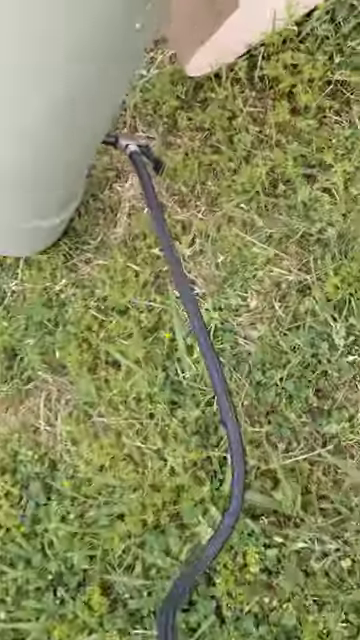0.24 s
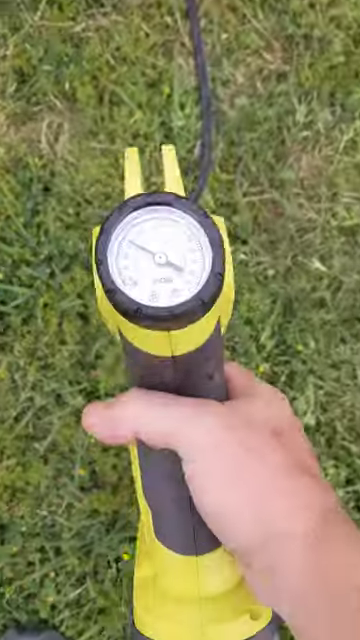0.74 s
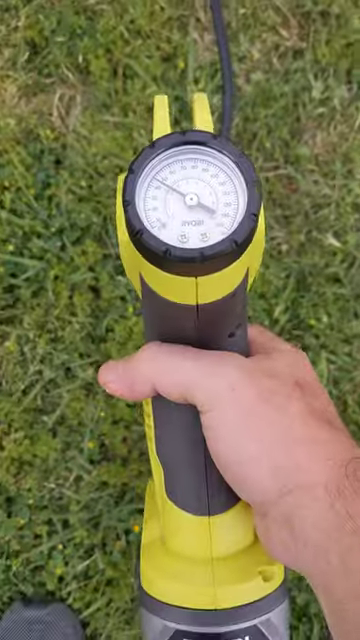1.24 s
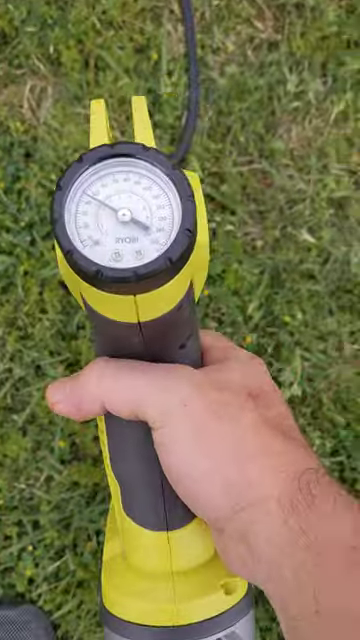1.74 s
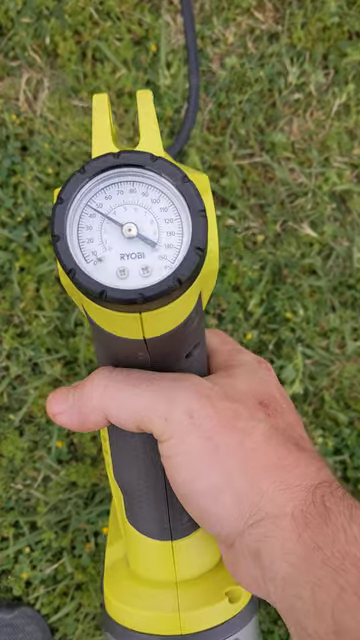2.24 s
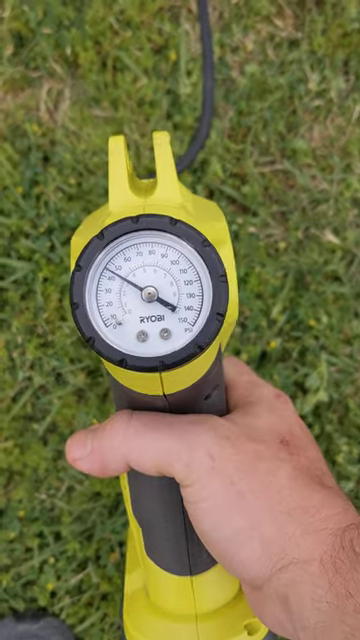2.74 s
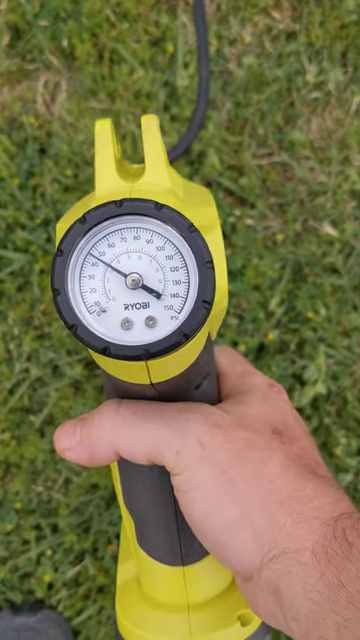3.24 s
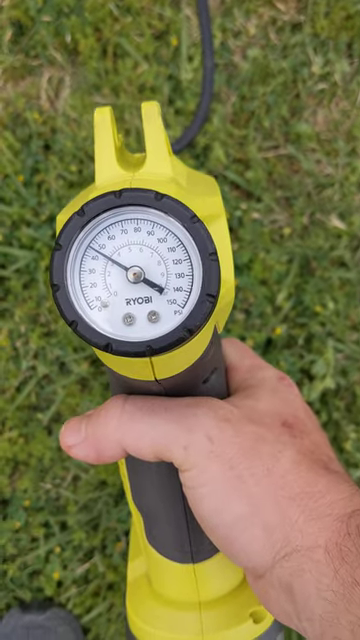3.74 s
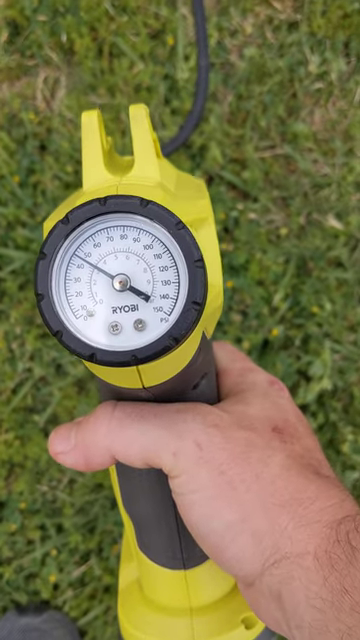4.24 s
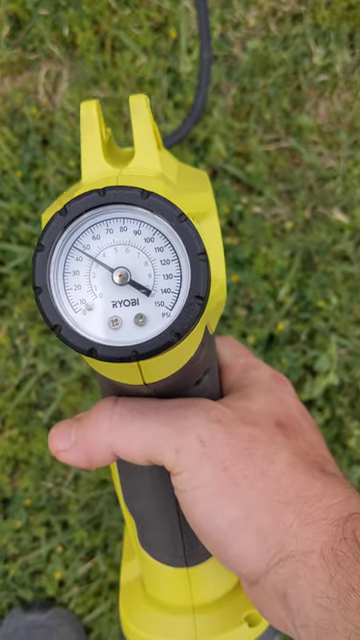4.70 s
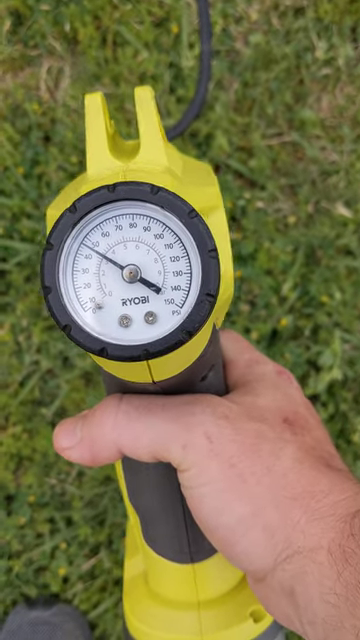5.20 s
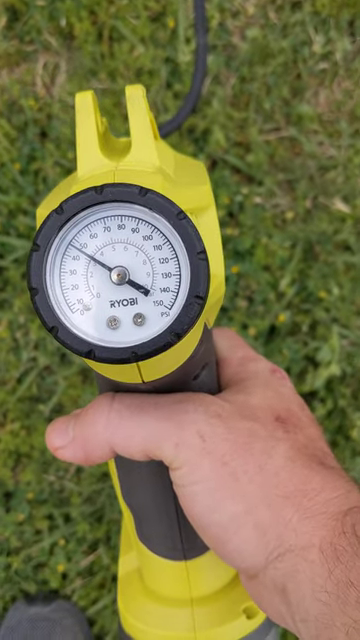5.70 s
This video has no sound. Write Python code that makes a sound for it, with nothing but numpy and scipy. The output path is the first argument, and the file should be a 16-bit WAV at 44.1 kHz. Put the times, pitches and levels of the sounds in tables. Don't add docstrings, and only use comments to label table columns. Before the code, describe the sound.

Sharp steady leak hiss and low wind thumps, then an electric air pump starts abruptly into a fast, harsh, rattling buzz.

```python
import sys
import numpy as np
from scipy import signal
from scipy.fft import rfft, irfft, next_fast_len
from scipy.io import wavfile
from scipy.ndimage import uniform_filter1d, map_coordinates

SR = 44100
rng = np.random.default_rng(int(sys.argv[2]) if len(sys.argv) > 2 else 0)


def amp(db):
    return 10 ** (np.asarray(db, float) / 20)


def write(x):
    x = np.atleast_2d(x).T
    wavfile.write(sys.argv[1], SR, np.round(np.clip(x, -1, 1) * 32767).astype(np.int16))


N = 262836

# time_s, level_db, turned_away (0-1), left_lag_samples
LEAK_PATH = [
    (0, -19.5, .02, 17.5),
    (.08, -20, .03, 18.5),
    (.25, -23, 0.88, 16.4),
    (.5, -26.5, 0.84, 15.8),
    (.68, -29, .8, 18.7),
    (1, -29.5, .8, 18.9),
    (5.96, -32, .98, 18.4),
]
# pitch_hz, facing_left_db, facing_right_db, away_left_db, away_right_db
JET_COLOUR = [(300, -40, -32, -8, -23), (1000, -38, -28, -15, -14), (1540, -37, -28, -8, -16),
              (2680, -24, -20, -25, -18.5), (3560, -12, -13.5, -18, -4.5), (4600, 1, 1, -4, -4),
              (5230, -5, -4, -4.5, 5), (6100, -4, 2.5, 8, 5.5), (7100, -5, 1, -18, -17),
              (8100, -35, -8, -6, -15), (10100, -32, -12.5, -17, -10.5), (12500, -32, -14, -16, -11.5),
              (14500, -32, -16, -28, -24), (16000, -40, -22, -23, -13)]
# start_s, length_s, level_db
LEFT_GUSTS = [(0, 0.35, -16.5), (1.01, .16, -8.5), (1.35, .1, -22), (1.77, 0.15, -7.5), (1.96, .1, -15),
              (2.4, 0.051, -28), (2.55, 0.075, -24), (2.72, 0.24, -19.5), (3.6, 0.32, -27),
              (4.6, 0.05, -13.5), (4.73, 0.095, -19), (4.92, 0.28, -20.5), (5.26, 0.15, -22),
              (5.55, 0.45, -27)]
# start_s, length_s, level_db
RIGHT_GUSTS = [(.05, 0.34, -39), (.5, .2, -35.5), (.95, 0.14, -28), (1.17, 0.1, -22.5), (1.38, 0.22, -23),
               (1.9, 0.37, -32.5), (2.55, 0.054, -29), (2.93, .25, -35), (3.95, 0.17, -36)]
# pitch_hz, level_db
BREEZE_COLOUR = [(22, -42), (40, -15), (60, -0.5), (100, -7.5), (200, -16.5), (400, -33), (900, -72),
                 (2000, -90)]
# pitch_hz, level_db
GUST_COLOUR = [(22, -34), (40, -3), (70, 2), (130, 1.5), (250, -5), (500, -22.5), (1000, -32), (2000, -30),
               (4000, -95)]
# pitch_hz, slap_db, flick_db
EDDY_COLOUR = [(25, -35, -50), (58.6, -7, -30), (118, -1, -46), (216, -7.5, 5), (393, -18.5, 4),
               (804, -36, -12), (1500, -67, -31)]
# time_s, level_db
AIR_SLAPS = [(0.091, -13), (0.157, -17.5), (0.252, -11), (1.033, -3.5), (1.07, -10), (1.132, -8.5),
             (1.162, -23), (1.827, -18), (1.853, -21), (1.893, -1), (1.965, -12), (1.995, -17),
             (2.632, -14.5), (2.743, -28), (2.922, -12), (2.965, -17), (3.655, -19), (3.769, -15),
             (4.632, -17.5), (4.86, -18), (4.928, -21), (4.992, -20), (5.03, -20), (5.315, -18),
             (5.774, -25)]
# time_s, level_db
AIR_FLICKS = [(.076, -13.5), (.145, -26), (.208, -24), (.244, -19), (.29, -23), (.47, -32.5), (1.035, -16),
              (1.112, -10.5), (1.81, -13.5), (1.782, -31), (5.315, -29)]
# crank_angle_turns, body_db, top_end_db, noise_tail_turns
CRANK_SNAPS = [(.15, 3, 0, .02), (.21, 2, 3, .02), (.26, 2, 2, .015), (.285, 1, 5, .015), (.385, 3, 3, .02),
               (.46, 3, 3, .05), (.51, 5, 2, .06), (.685, 7, 3, .05), (.84, 2, 0, .04), (.97, 1, 3, .08),
               (1.045, 4, 3, .03)]
# pitch_hz, width_hz
SHELL_MODES = [(830, 130), (1250, 400), (1580, 170), (1950, 220), (2270, 250), (2610, 200), (2790, 170),
               (3560, 260), (4170, 180), (4530, 190), (4890, 170), (5310, 180), (5950, 350), (6400, 600)]
# left_db, right_db
SHELL_LEVELS = [(4.5, -3), (4.5, -14), (-18, 1.5), (4, 3.5), (-2, -0.5), (-9.5, 8), (2.5, 5), (3, 1),
                (0, 5.5), (6.5, -9), (-2.5, 6), (2.5, -1), (-15, -3.5), (-4, -6.5)]
# pitch_hz, width_hz
TOP_MODES = [(7700, 800), (8660, 200), (9250, 500), (11100, 1200), (13100, 700), (14700, 600), (15550, 500)]
# left_db, right_db
TOP_LEVELS = [(-6, -3.5), (-1.5, -9), (-13.5, -8), (-18, -12.5), (-8, -8.5), (-15, -7.5), (-12, -10)]
# pitch_hz, width_hz, first_gain, last_gain (added, as ratios)
TILT_MODES = [(1890, 280, 0.53, -0.44), (2700, 300, -.1, .05), (3130, 190, -.1, 0.81),
              (4240, 210, 0.16, -0.21), (4500, 220, -0.6, 0.026), (5350, 250, -0.39, 0.0029)]
# pitch_hz, width_hz
INTAKE_MODES = [(129, 66), (312, 105), (400, 600), (664, 213), (814, 52)]
# left_db, right_db
INTAKE_LEVELS = [(3, -3.3), (-8, -24), (-50, -12.3), (-7.9, -50), (-7.6, -18.5)]
# delay_s, level_db
ECHOES = [(.0072, -16), (.0092, -18)]
# pitch_hz, width_hz
COVER_MODES = [(1330, 200), (1470, 120), (1590, 100), (1930, 250), (2280, 200), (2590, 160), (2790, 220)]
# left_db, right_db
COVER_LEVELS = [(-15.5, -10.5), (-7, -51), (-49, -52), (-14, -11), (-11.5, -39), (-35, -7), (-13, -12)]
# pitch_hz, width_hz
REED_MODES = [(2590, 60), (2780, 60)]
# left_db, right_db
REED_LEVELS = [(-16, -26), (-7, -29.5)]
# time_s, left_drop_db, right_drop_db, hold_s, release_s
GAIN_DROPS = [
    (1.031, 9, 2.5, 0.049, 0.11),
    (1.878, 10.5, 1.5, 0.066, 0.053),
]

POP_ANGLE = .378
GEAR = 4.6
SWITCH_S, SPIN_UP_S = .683, .02319
TOP_SPEED, SAG_PER_S = 59.0734, .06177

TIME = np.arange(N) / SR
RUNNING = np.clip(TIME - SWITCH_S, 0, None)
SPEED = (TOP_SPEED - SAG_PER_S * RUNNING) * (1 - np.exp(-RUNNING / SPIN_UP_S))
TURNS = np.cumsum(SPEED) / SR
TURN = np.arange(1, 320)


def unit(x):
    return x / np.sqrt(np.mean(x ** 2) + 1e-20)


def curves(rows):
    s, *cols = np.transpose(rows)
    return [np.interp(TIME, s, c) for c in cols]


def filtered(x, response):
    m = next_fast_len(N + 8192)
    return irfft(rfft(x, m) * response(np.fft.rfftfreq(m, 1 / SR)), m)[..., :N]


def colour(points):
    f, *cols = np.transpose(points)
    return lambda hz: amp([np.interp(np.log(hz + 1), np.log(f + 1), db) for db in cols])


def resonance(hz, centre, width):
    return 1j * hz * width / (centre * centre - hz * hz + 1j * hz * width)


def modes(shapes, levels, sign=-1):
    return lambda hz: sum(sign ** k * amp(np.c_[list(db)]) * resonance(hz, centre, width)
                          for k, ((centre, width), db) in enumerate(zip(shapes, levels)))


def humps(shapes, levels, steep):
    def response(hz):
        power = 0
        for (centre, width), db in zip(shapes, levels):
            hump = (hz * width) ** 2 / ((centre * centre - hz * hz) ** 2 + (hz * width) ** 2)
            power = power + amp(2 * np.c_[list(db)]) * hump ** steep
        return np.sqrt(power)
    return response


def wobble(rate, channels=1):
    knots = rng.standard_normal((channels, int(N * rate / SR) + 4))
    return np.array([map_coordinates(k, [np.arange(N) * rate / SR]) for k in knots])


def pair(alike):
    shared, *own = rng.standard_normal((3, N))
    alike = np.clip(alike, 0, 1)
    return np.sqrt(alike) * shared + np.sqrt(1 - alike) * np.array(own)


def ports(x, lag):
    return filtered(x, lambda hz: np.exp(-2j * np.pi * hz * np.array([[lag], [0]]) / SR))


def pulses(s, size):
    at = s * SR
    keep = (at > 8) & (at < N - 9)
    i = np.floor(at[keep])[:, None] + np.arange(-7, 9)
    d = i - at[keep][:, None]
    taps = size[keep][:, None] * np.sinc(d) * np.cos(np.pi * d / 16) ** 2
    return np.bincount(i.astype(int).ravel(), taps.ravel(), N)


def leak():
    level_db, away, lag = curves(LEAK_PATH)
    away = np.clip(away, 0, 1)
    jet = filtered(np.vstack([pair(alike=.93), pair(alike=.88)]), colour(JET_COLOUR))
    facing, turned = unit(jet[:2]), unit(jet[2:])
    left, right = np.sqrt(1 - away) * facing + np.sqrt(away) * turned
    left = map_coordinates(left, [np.arange(N) - lag], mode="mirror", order=5)
    return amp(level_db + 0.34 * wobble(20)) * np.array([left, right])


def gusts(rows, calm_db):
    strength = amp(calm_db)
    for s, hold, db in rows:
        rise = np.clip(s - TIME, 0, None) / 0.0064
        fall = np.clip(TIME - s - hold, 0, None) / 0.025
        strength = strength + amp(db) * np.exp(-rise - fall)
    return 20 * np.log10(strength)


def even(x, share):
    swing = signal.hilbert(x)
    return unit(np.real(swing / uniform_filter1d(np.abs(swing), 900, axis=-1) ** share))


def buffeting():
    level_db = np.array([gusts(LEFT_GUSTS, calm_db=-29), gusts(RIGHT_GUSTS, calm_db=-36.5)])
    level_db = level_db + 3 * wobble(22, channels=2)
    hard = 1 / (3.5 + np.exp(-(level_db + 21.5) / 3))
    soft = even(filtered(pair(alike=.3), colour(BREEZE_COLOUR)), share=.7)
    rough = even(filtered(pair(alike=.3), colour(GUST_COLOUR)), share=.7)
    return amp(level_db - [[5], [1.5]]) * (np.sqrt(1 - hard) * soft + np.sqrt(hard) * rough)


def lumps(events, width):
    s, db = np.transpose(events)
    bell = np.exp(-(np.arange(-2000, 2001) / (SR * width)) ** 2)
    return np.sqrt(np.abs(signal.fftconvolve(pulses(s, amp(2 * db)), bell, "same")))


def eddies():
    swing = signal.hilbert(filtered(rng.standard_normal((2, N)), colour(EDDY_COLOUR)))
    swing = np.real(swing / np.abs(swing) ** 0.65)
    slaps = lumps(AIR_SLAPS, width=0.011) * unit(swing[0])
    flicks = lumps(AIR_FLICKS, width=0.0073) * unit(swing[1])
    return (slaps + flicks) * amp([[0], [-24]])


def moment(angle):
    return np.interp(angle, TURNS + 1e-9 * np.arange(N), TIME, right=99)


def crank_noise():
    around = np.arange(1024) / 1024
    snaps = np.zeros((2, N))
    bursts_db = np.array([[1.2], [1.8]]) * np.cos(2 * np.pi * (around - [[.55], [.3]]))
    drift = wobble(4)[0]
    for angle, body_db, high_db, tail in CRANK_SNAPS:
        luck = rng.standard_normal((len(TURN), 2))
        s = moment(TURN - 1 + angle)
        s = s + 5e-5 * drift[np.minimum(s * SR, N - 1).astype(int)] + 1.5e-5 * luck[:, 0]
        snaps += amp([[body_db], [high_db]]) * pulses(s, amp(5.15 * luck[:, 1]))
        fade = np.exp(-((around - angle) % 1) / tail)
        bursts_db += np.array([[0.15 * body_db], [2.0 * high_db]]) * fade
    gates = [amp(np.interp(TURNS % 1, around, db) + 0.32 * wobble(60)) for db in bursts_db]
    return snaps, gates


def tilted(body):
    early = np.exp(-(RUNNING / 3.6) ** 2)
    changes = 0
    for hz, width, first, last in TILT_MODES:
        gain = last + (first - last) * early
        changes = changes + gain * filtered(body, modes([(hz, width)], [(0, 0)]))
    return body + changes


def shell():
    top_db = -4 - 4.5 * np.exp(-RUNNING / 1.67) + 3.5 * np.exp(-((RUNNING - 0.1) / 0.077) ** 2)
    attack = 1 - np.exp(-np.clip(TIME - SWITCH_S + 0.0065, 0, None) / 0.015)
    snaps, (body_gate, top_gate) = crank_noise()

    def snap_ring(hz):
        above = 1 / (1 + (3100 / (hz + 1)) ** 8)
        return above * modes(SHELL_MODES, SHELL_LEVELS)(hz)

    body = unit(filtered(body_gate * pair(alike=.9), humps(SHELL_MODES, SHELL_LEVELS, steep=1.3)))
    body += amp(-6) * unit(filtered(snaps[0], snap_ring))
    body = tilted(body)
    top = unit(filtered(top_gate * pair(alike=.45), humps(TOP_MODES, TOP_LEVELS, steep=.95)))
    top += amp(-19) * unit(filtered(snaps[1], modes(TOP_MODES, TOP_LEVELS)))
    return attack * amp(-20 + 0.45 * wobble(6)) * (body + amp(top_db) * top)


def motor():
    shaft = 2 * np.pi * GEAR * TURNS
    hum = amp(-41) * np.sin(shaft) + amp(-46) * np.sin(3 * shaft)
    hum = hum + amp(-41 + 2 * wobble(1.5)) * np.sin(7 * shaft)
    hum += amp(-35.5) * np.sin(2 * np.pi * (TURNS - .2))
    return hum * SPEED / TOP_SPEED * amp([[1], [-1]])


def blows(angle, shaft_s, scatter_s, scatter_db):
    at = TURN - 1 + angle
    luck = rng.standard_normal((len(TURN), 2))
    shaft = 2 * np.pi * GEAR * at
    s = moment(at) + shaft_s * np.sin(shaft) + scatter_s * luck[:, 0]
    size = amp(scatter_db * luck[:, 1] + .5 * np.cos(shaft + 2.35))
    return pulses(s, size) * amp(-2.5 - 9 * (1 - SPEED / TOP_SPEED))


def echo(hz):
    return 1 + sum(amp(db) * np.exp(-2j * np.pi * hz * s) for s, db in ECHOES)


def cover_knock():
    def response(hz):
        swell = resonance(hz, 1500, 2360) + resonance(hz, 2700, 400)
        return modes(COVER_MODES, COVER_LEVELS)(hz) * echo(hz) * swell

    knock = filtered(blows(POP_ANGLE - .02, 1.5e-5, 1e-5, 1.2), response)
    loose_db = 7 * np.exp(-RUNNING / 0.093)
    return amp(30 + loose_db) * knock


def intake_pop():
    def response(hz):
        soft = 1j * hz / 400 / (1 + (hz / 895) ** 15)
        return -modes(INTAKE_MODES, INTAKE_LEVELS, sign=1)(hz) * echo(hz) * soft

    release = POP_ANGLE + .0145
    air = filtered(blows(release, 3.5e-5, 1.5e-5, 0.093), response)
    choke = np.exp(-RUNNING / 0.03) * filtered(air, modes([(1020, 90)], [(0, 0)]))
    return amp(51.0) * choke + amp(32.0) * air


def reed_slap():
    return amp(36.0) * filtered(blows(POP_ANGLE + .6, 1e-5, 1e-5, 1.2), modes(REED_MODES, REED_LEVELS))


def scene():
    pump = shell() + motor() + cover_knock() + intake_pop() + reed_slap()
    return leak() + buffeting() + eddies() + ports(pump, lag=8.2)


def gain_control(x):
    drop_db = 0
    for s, left, right, hold, release in GAIN_DROPS:
        onset = np.clip((TIME - s) / 0.0048, 0, 1)
        recovery = np.exp(-np.clip(TIME - s - hold, 0, None) / release)
        drop_db = drop_db + np.array([[left], [right]]) * onset * recovery
    return x * amp(-drop_db)


def roll_off(x):
    return signal.sosfilt(signal.butter(12, 15940, fs=SR, output="sos"), x)


def record(dry):
    x = gain_control(dry)
    x = x / (1 + np.abs(x) ** 8) ** (1 / 8)
    x = filtered(x, lambda hz: (hz < 15760) / (1 + (36 / (hz + 1)) ** 6))
    return roll_off(x)


dry = scene()
out = record(dry)
write(out)
```